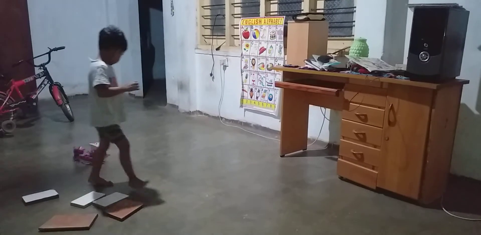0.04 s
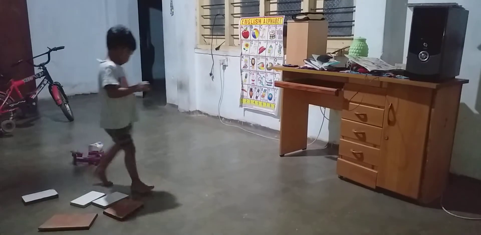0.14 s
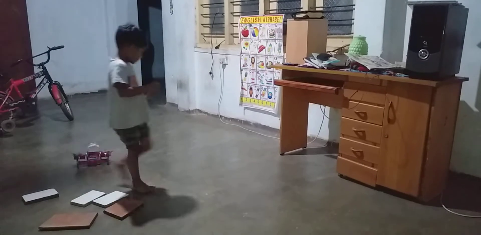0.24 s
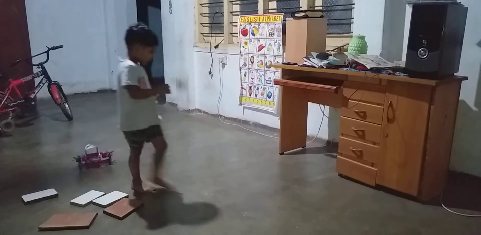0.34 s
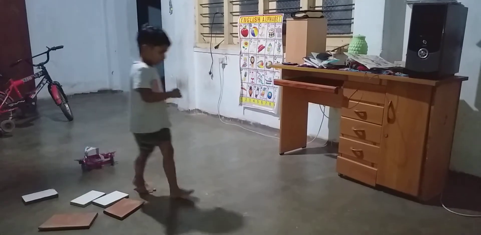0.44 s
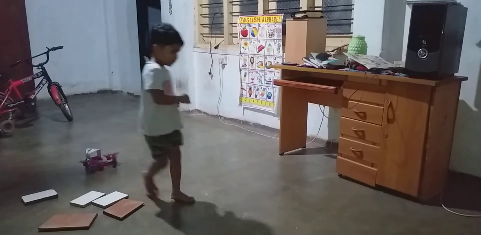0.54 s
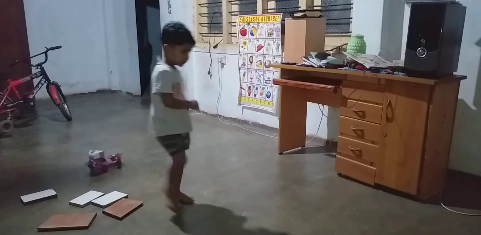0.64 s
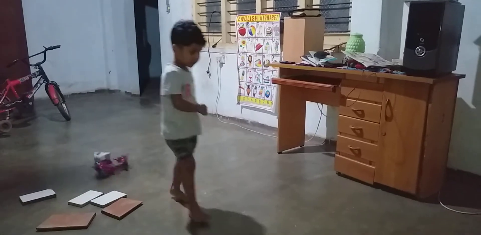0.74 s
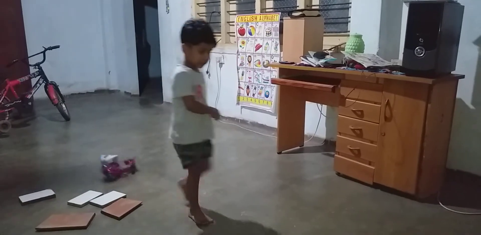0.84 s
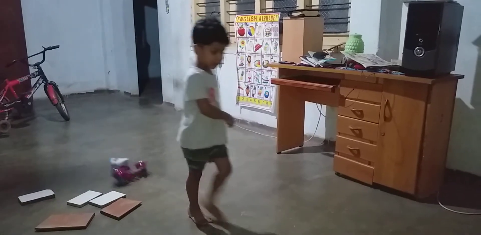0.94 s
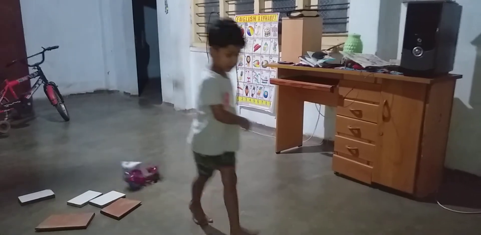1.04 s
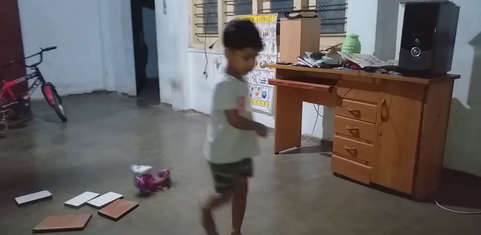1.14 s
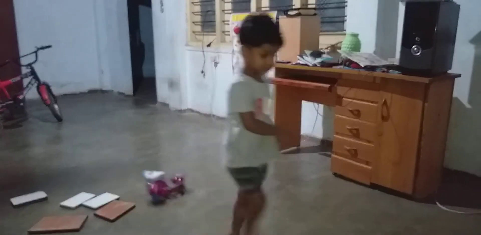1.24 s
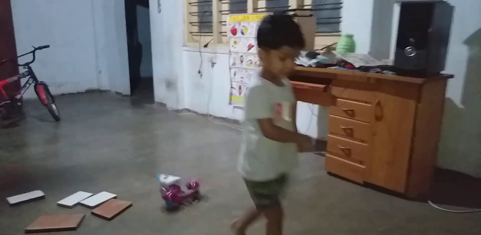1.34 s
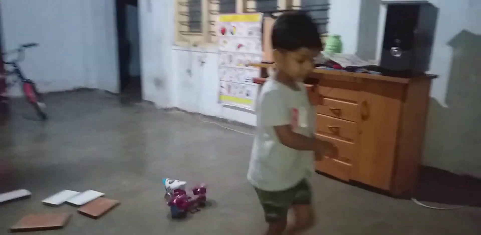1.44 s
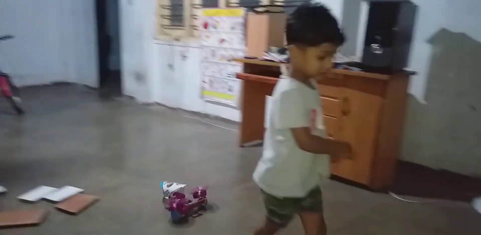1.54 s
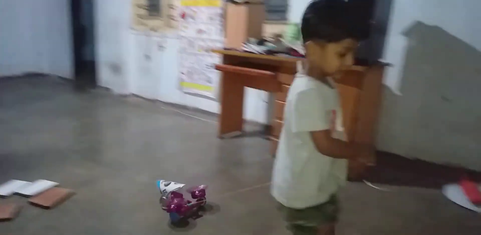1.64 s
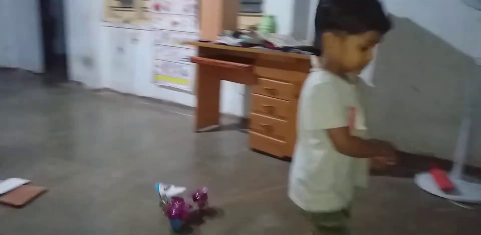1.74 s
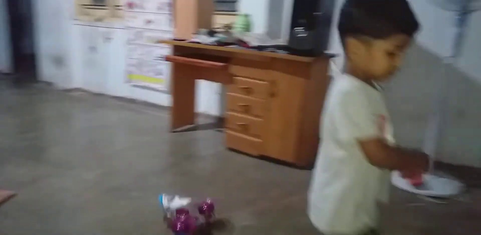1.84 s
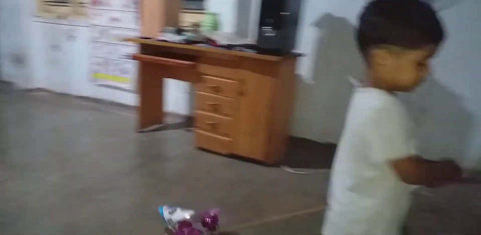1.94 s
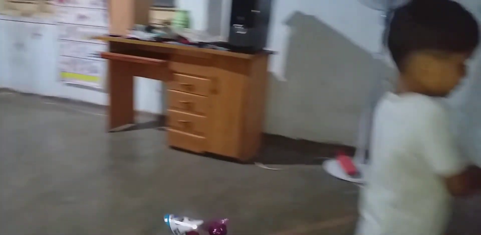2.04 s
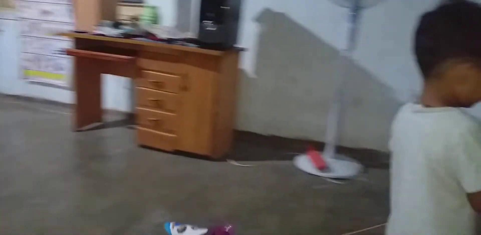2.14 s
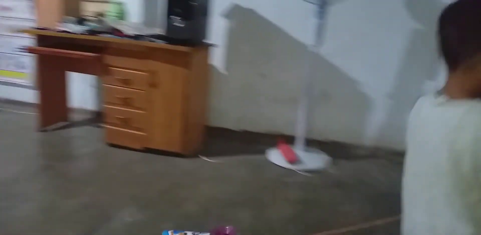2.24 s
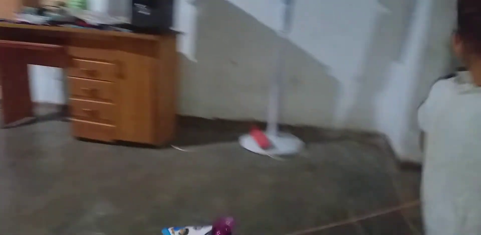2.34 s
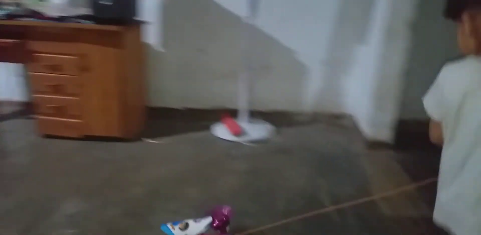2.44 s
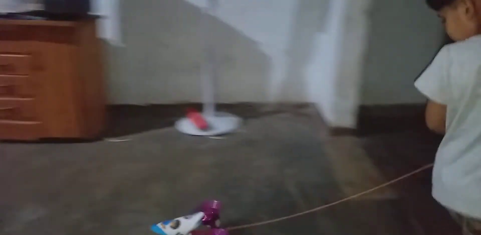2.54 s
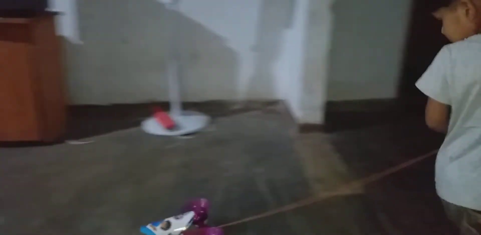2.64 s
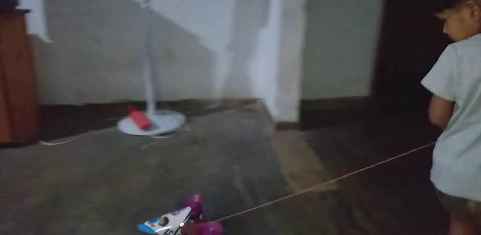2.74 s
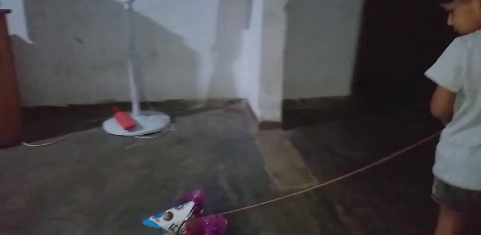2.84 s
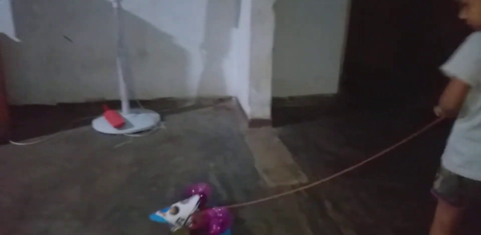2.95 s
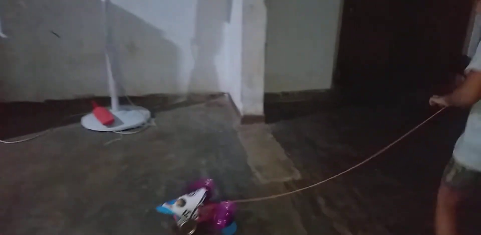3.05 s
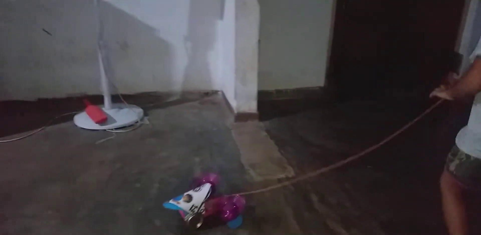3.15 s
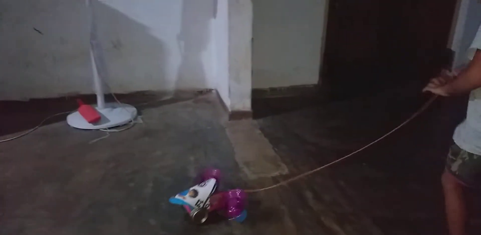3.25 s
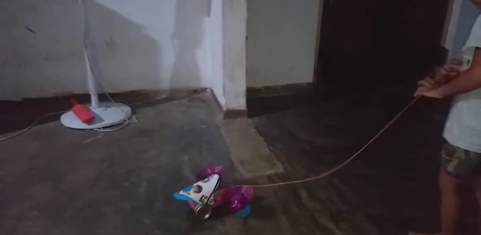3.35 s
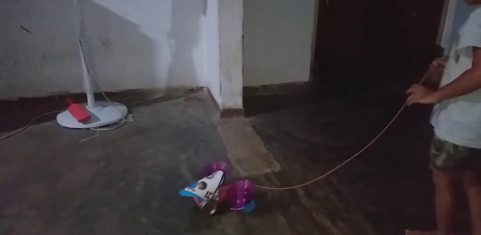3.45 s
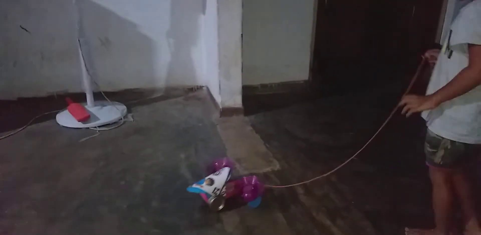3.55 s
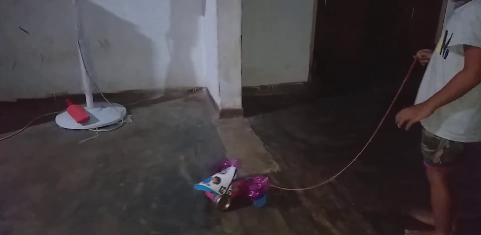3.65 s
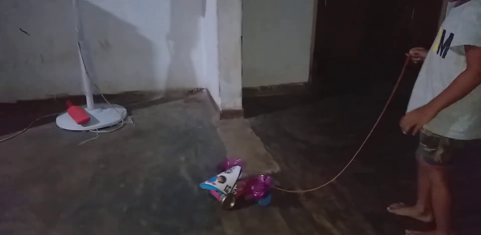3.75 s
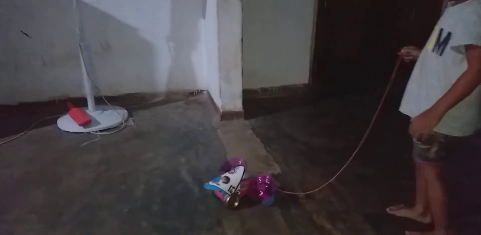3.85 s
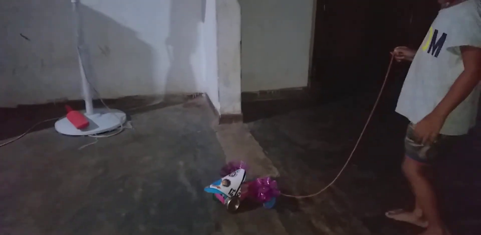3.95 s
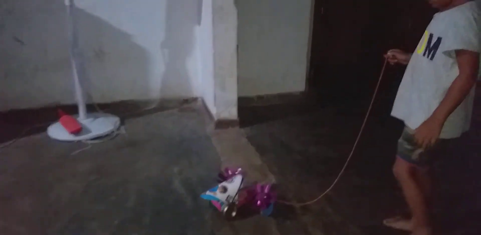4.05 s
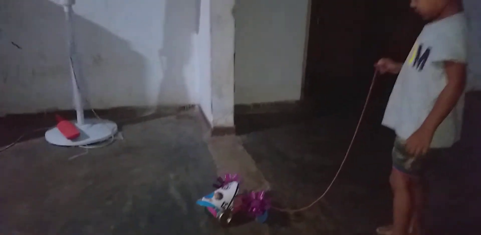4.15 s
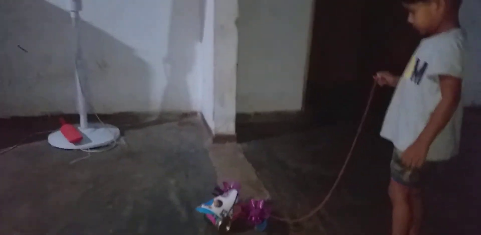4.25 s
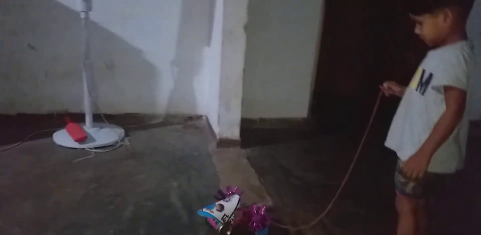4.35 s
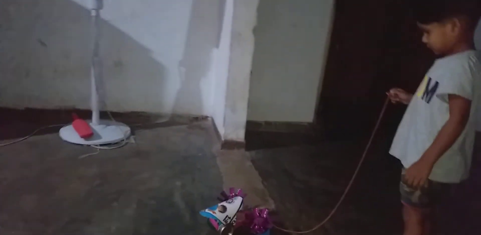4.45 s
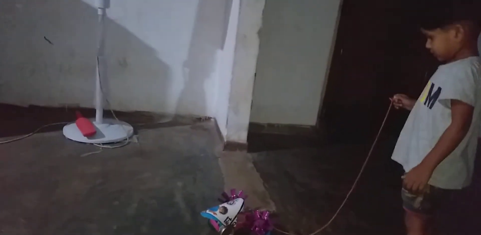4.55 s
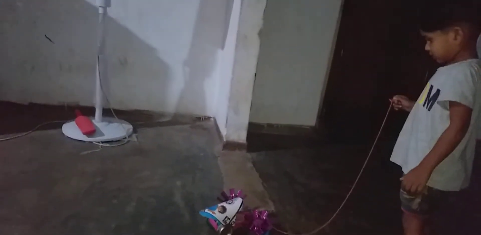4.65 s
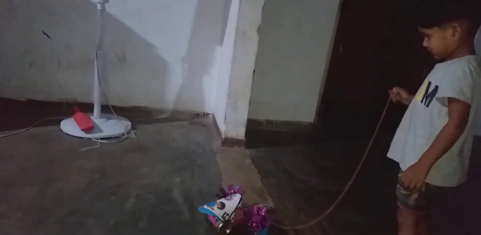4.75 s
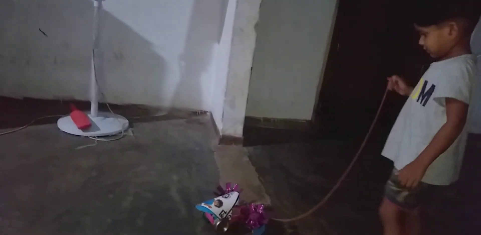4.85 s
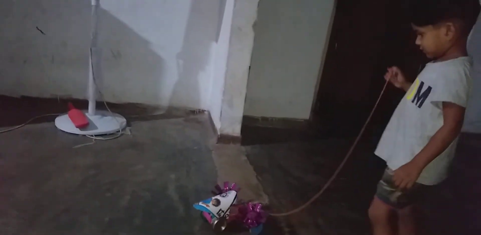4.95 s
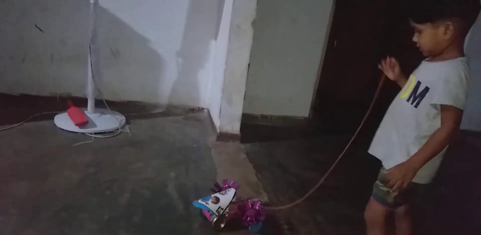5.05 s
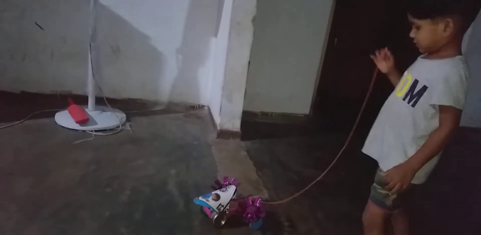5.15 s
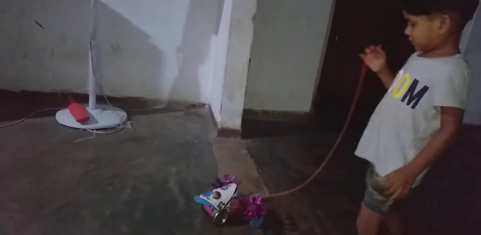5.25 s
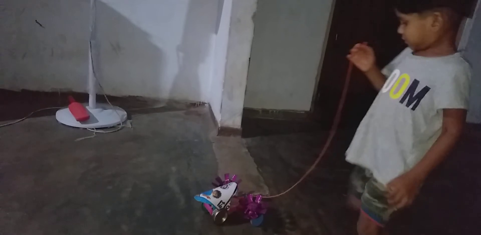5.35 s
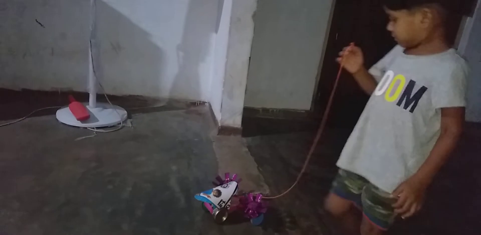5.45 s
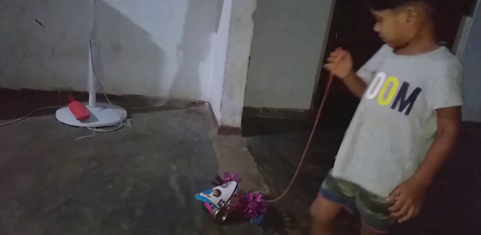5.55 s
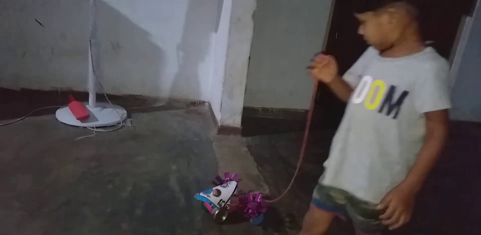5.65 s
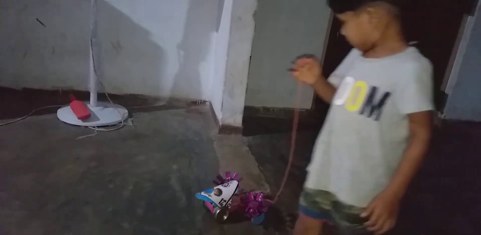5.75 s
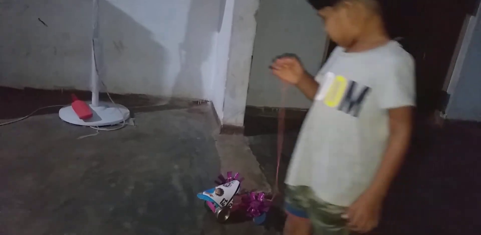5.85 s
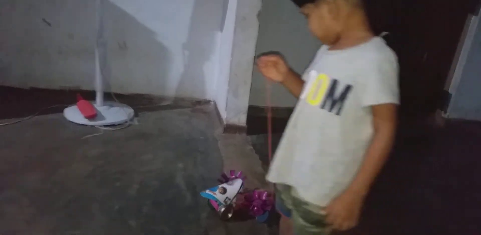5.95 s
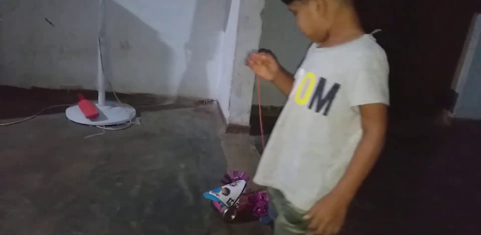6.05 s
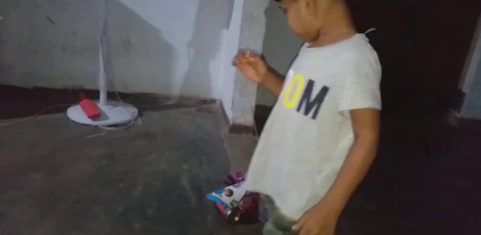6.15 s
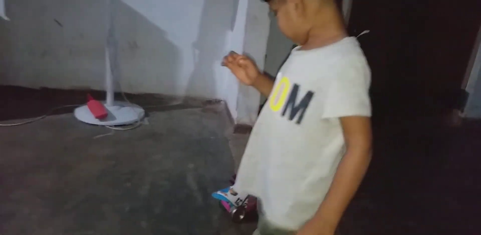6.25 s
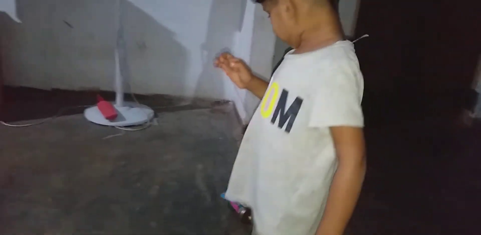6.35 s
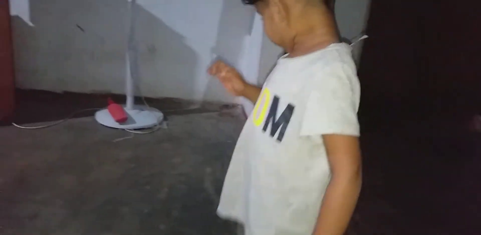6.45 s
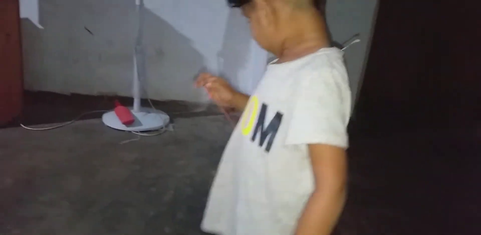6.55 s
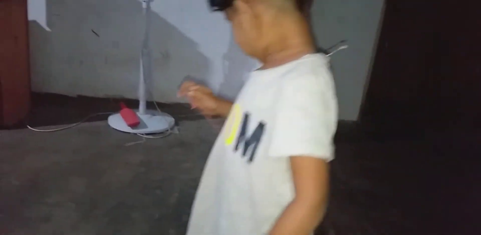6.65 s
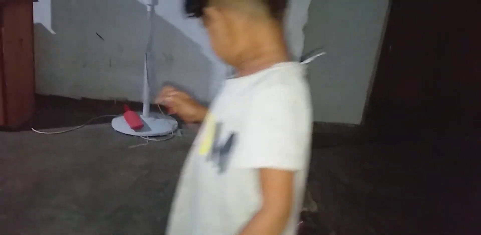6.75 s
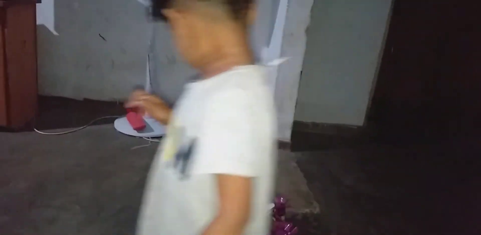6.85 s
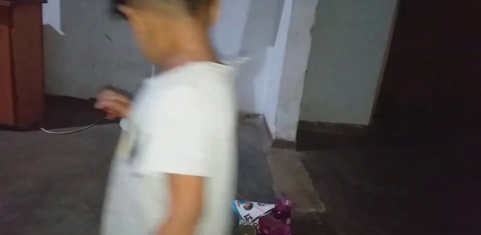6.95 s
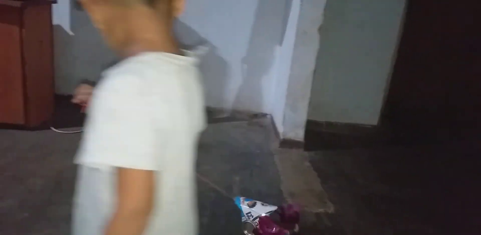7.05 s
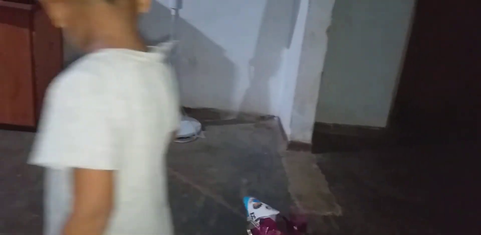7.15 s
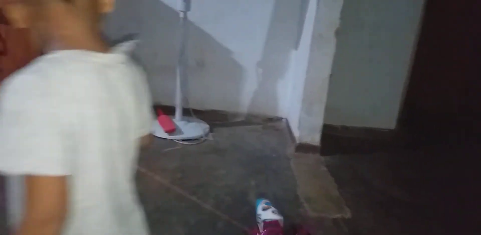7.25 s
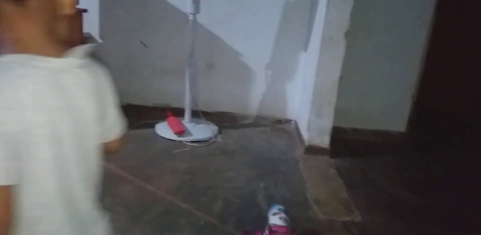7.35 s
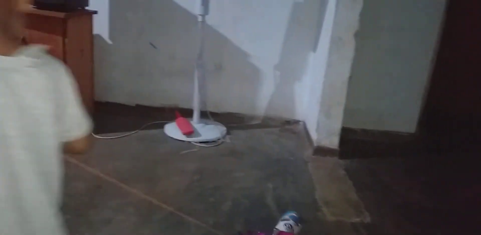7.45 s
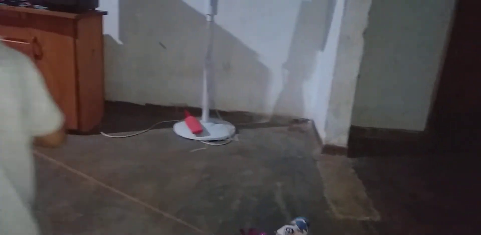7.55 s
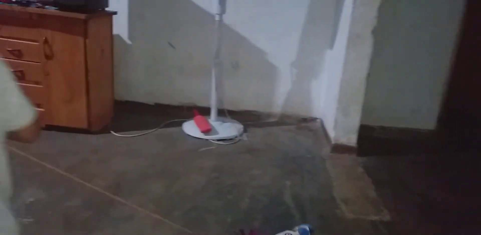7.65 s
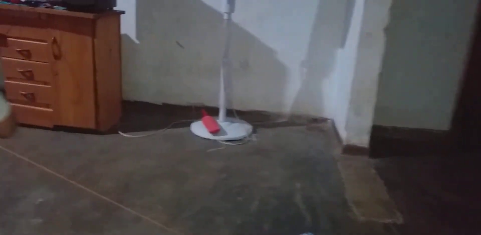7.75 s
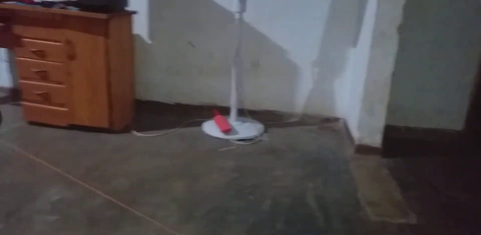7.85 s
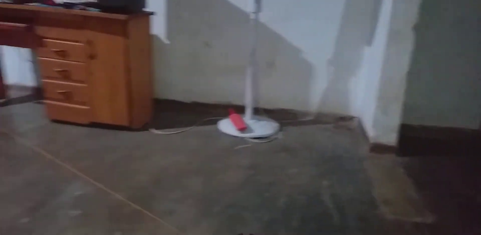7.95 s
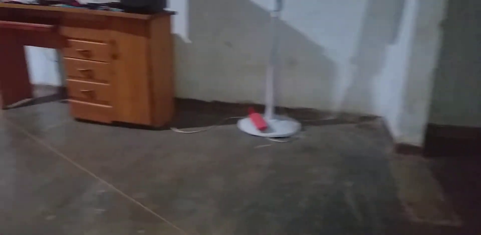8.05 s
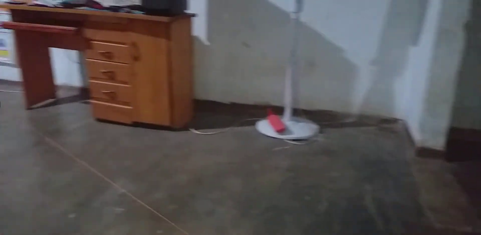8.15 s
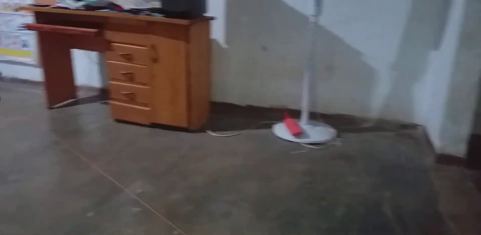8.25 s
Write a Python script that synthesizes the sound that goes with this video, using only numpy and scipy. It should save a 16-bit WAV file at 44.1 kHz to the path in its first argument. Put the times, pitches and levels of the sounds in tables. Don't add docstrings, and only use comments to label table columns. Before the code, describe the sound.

Small toy wheels grind over gritty cement while sharp tinny snaps speed up, slow and stop, then return after a quiet pause, in an echoing room.

```python
import sys
import numpy as np
from scipy import signal
from scipy.fft import rfft, irfft, next_fast_len
from scipy.io import wavfile
from scipy.ndimage import uniform_filter1d

SR = 44100
rng = np.random.default_rng(int(sys.argv[2]) if len(sys.argv) > 2 else 0)


def digitize_waveform(pressure):
    field = np.atleast_2d(pressure).T
    bounded = np.clip(field, -1, 1)
    quanta = np.round(bounded * 32767).astype(np.int16)
    wavfile.write(sys.argv[1], SR, quanta)


def voltage_ratio(level):
    return 10 ** (np.asarray(level, float) / 20)


N = 366030
T = np.arange(N) / SR

# frequency in Hz, density in dB per Hz.
CRACK = [(150, -87.5), (250, -42), (1380, -32), (1530, 2), (1700, -9.5), (2670, -8), (3770, -9.5),
         (7310, -18.5), (9170, -30), (11700, -23.5), (16000, -20)]
# frequency in Hz, density in dB per Hz.
GRIT = [(150, -54.5), (250, -25), (452, -24), (875, -7.5), (1020, -13), (2050, 2), (2530, -9.5),
        (5350, -9.5), (9010, -30.5), (10400, -17), (16000, -14)]


def level(x, db):
    return x * voltage_ratio(db) / np.sqrt(np.mean(x ** 2))


def on_log_hz(table, hz):
    points = np.array(table)
    return np.interp(np.log(hz + 1), np.log(points[:, 0]), points[:, 1])


def convolve(x, response):
    size = next_fast_len(len(x) + len(response))
    return irfft(rfft(x, size) * rfft(response, size), size)[:len(x)]


def colour(x, table):
    log_gain = on_log_hz(table, np.linspace(0, SR / 2, 1025)) * np.log(10) / 20
    ceps = irfft(log_gain)
    ceps[1:1024] *= 2
    return convolve(x, irfft(np.exp(rfft(ceps[:1025], 2048))))


def high(x, hz):
    return signal.sosfilt(signal.butter(3, hz, "high", fs=SR, output="sos"), x)


def rings(x, peaks):
    return sum(voltage_ratio(db) * signal.lfilter(*signal.iirpeak(hz, hz / width, SR), x) for hz, width, db in peaks)


def narrow_noise(hz, width, skirt):
    inner = rings(rng.standard_normal(N), [(hz, width, 0)])
    return level(rings(inner, [(hz, skirt * width, 0)]), 0)


def curve(table):
    points = np.array(table)
    return np.interp(T, points[:, 0], points[:, 1], -120, -120)


def swell(start, length, power):
    return np.sin(np.pi * np.clip((T - start) / length, 0, 1)) ** power


def walk(rate):
    k = int(SR / rate)
    held = np.repeat(rng.standard_normal(N // k + 1), k)
    return 0.67 * uniform_filter1d(uniform_filter1d(held, k), k)[:N]


def waver(hz, spread_hz, rate):
    return np.sqrt(2) * np.sin(2 * np.pi * np.cumsum(hz + spread_hz * walk(rate)) / SR)


def grains(per_s, spread_db):
    ticks = (rng.random(N) < per_s / SR) * rng.standard_normal(N)
    size_db = spread_db * np.minimum(rng.exponential(size=N), 4)
    return level(ticks * voltage_ratio(size_db), 0)


def crickets():
    # start in seconds, length in seconds, level in dB.
    chirp_rows = [(3.75, .3, -50), (4.093, 0.23, -75), (4.364, 0.13, -69.5), (4.652, 0.25, -68.5),
                  (4.879, 0.17, -67), (5.04, 0.19, -67), (5.22, 0.17, -71), (5.462, 0.22, -65.5),
                  (5.80, 0.2, -64), (6.069, 0.33, -68), (6.45, .25, -52), (6.8, .25, -70),
                  (7.15, 0.37, -73)]
    # frequency in Hz, width in Hz, level in dB.
    chorus = [(5040, 300, -73.5), (5600, 150, -82), (6900, 300, -75.5), (7940, 500, -73.5),
              (8040, 160, -75)]
    song_hz = 3350
    chirps = sum(voltage_ratio(db) * swell(s, length, 0.59) for s, length, db in chirp_rows)
    throb = 1 + .25 * waver(24, 6.0, 4)
    wing = throb * waver(song_hz, 60, 300)
    blur = narrow_noise(song_hz, 150, 2)
    near = (chirps + voltage_ratio(-74)) * (.7 * wing + .7 * blur)
    far = sum(voltage_ratio(db + 3.0 * walk(4.4)) * narrow_noise(hz, width, 3.0) for hz, width, db in chorus)
    return near + far


def night():
    # frequency in Hz, level in dB.
    hum_tones = [(64, -69), (100, -73), (160, -74.5), (199.5, -61), (245, -75.5), (344, -74), (500, -68)]
    # frequency in Hz,
    # density in dB per Hz.
    air_shape = [(20, -23.5), (60, -9), (200, -7), (330, -13), (560, -16), (950, -22.5), (2000, -22),
                 (2750, -30.5), (3600, -23), (4300, -32.5), (7950, -24.5), (9700, -23), (10300, -40.5),
                 (16000, -39)]
    # start in seconds, length in seconds, extra level in dB.
    draughts = [
        (.6, .6, 4.5),
        (4.696, 1.33, 3.5),
        (5.7, 2.56, 5),
    ]
    hum = sum(voltage_ratio(db + 2.0 * walk(3.4)) * waver(hz, 2.3, 7.6) for hz, db in hum_tones)
    air = level(colour(rng.standard_normal(N), air_shape), -58.5)
    draught_db = sum(db * swell(s, length, 0.84) for s, length, db in draughts) - 3.0
    return crickets() + (hum + air) * voltage_ratio(draught_db + .8 * walk(2.9))


def creeps():
    # start in seconds, length in seconds, frequency in Hz, width in Hz, level in dB.
    whispers = [
        (5.16, 0.24, 1830, 302, -61),
        (5.361, 0.56, 5600, 300, -69),
        (5.7, .2, 1580, 120, -69),
    ]
    return sum(swell(s, length, 1) * voltage_ratio(db) * narrow_noise(hz, width, 2) for s, length, hz, width, db in whispers)


def shuffle():
    # start in seconds, length in seconds, level in dB, dull part in dB.
    rubs = [
        (4.8, .12, -62, -18),
        (5.02, 0.29, -62.5, -2),
        (5.36, 0.12, -66, -9),
        (5.523, 0.063, -63, -8),
        (5.55, 0.19, -70, -6),
        (5.758, 0.2, -64, -10),
        (6.3, .1, -67, -1),
        (6.373, 0.056, -55, -7),
    ]
    rub = grains(9000, 2.5)
    bands = [(1800, 730, 0), (5000, 4000, 0), (12000, 6700, 0)]  # Hz, width in Hz, dB
    dull, middle, bright = (level(rings(rub, [band]), 0) for band in bands)
    rustle = middle + voltage_ratio(-10) * high(bright, 6500)
    return sum(swell(s, length, 0.86) * voltage_ratio(db) * (rustle + voltage_ratio(dull_db) * dull) for s, length, db, dull_db in rubs)


def steps():
    # time in seconds, peak level in dB, frequency in Hz.
    heels = [(0.469, -38.5, 426), (0.727, -39.5, 354), (0.799, -51, 431), (0.868, -58, 374),
             (0.85, -43, 200), (1.079, -61, 192), (1.871, -46, 307), (2.049, -39, 395), (2.215, -44, 300),
             (2.448, -42, 410), (2.649, -48, 285), (2.95, -44.5, 300), (3.349, -44.5, 380),
             (5.1, -55.5, 207), (6.397, -59, 199), (6.929, -48, 401), (7.499, -48, 346), (7.999, -44, 410)]
    out, t = np.zeros(N + SR), T[:SR // 4]
    for s, db, hz in heels:
        push = rng.standard_normal(len(t)) * t / .01 * np.exp(-t / 0.055)
        thump = rings(push, [(hz, 0.25 * hz, 0)])
        start = int(s * SR)
        out[start:start + len(t)] += voltage_ratio(db + 3.0) * thump / np.max(abs(thump))
    return out[:N]


def scrape():
    # time in seconds, level in dB.
    pressure = [
        (6.36, -63),
        (6.396, -59),
        (6.438, -50.5),
        (6.514, -33.5),
        (6.534, -32.5),
        (6.646, -43),
        (6.72, -51),
    ]
    # frequency in Hz, width in Hz, level in dB.
    shell_rings = [(2170, 20, -11.5), (3870, 40, -4.5), (5050, 95, -4.5), (6250, 29, -14), (6930, 68, -9),
                   (10940, 64, -19.5), (12400, 54, -33), (13200, 83, -18), (14100, 63, -26)]
    slips, press_db = grains(6000, 2.2), curve(pressure)
    shell = high(rings(slips, [(hz, 3.0 * width, db) for hz, width, db in shell_rings]), 700)
    rasp = level(colour(slips, GRIT), -5)
    return voltage_ratio(press_db) * (voltage_ratio(0.67 * (press_db + 38)) * level(shell, -2) + rasp)


def wheels():
    # time in seconds, level
    # in dB.
    rolling = [(0, -32), (.34, -28.5), (1.02, -26), (2.02, -19), (2.72, -24.5), (3.52, -36), (3.96, -46.5),
               (4.25, -58), (4.31, -75), (6.41, -75), (6.51, -43), (6.75, -33), (7.09, -30), (7.3, -29.5),
               (7.47, -29.5), (7.91, -28.5), (8.31, -22)]
    # frequency in Hz, width in Hz, level in dB.
    frame_rings = [(845, 58, -11), (2070, 270, 0.5), (3037, 190, -1.5), (5500, 410, -1.5),
                   (6820, 1000, -7.5), (12600, 100, -7), (14200, 800, -3), (15100, 200, -14.5)]
    roll_db, patchy = curve(rolling), voltage_ratio(1.6 * walk(13))
    frame = level(high(rings(grains(3000, 3.0), frame_rings), 460), -7.0)

    axle_hz = 5399.5 + 28 * np.clip(roll_db + 29.5, -12, 0)
    tone = np.sqrt(2) * np.sin(2 * np.pi * np.cumsum(axle_hz) / SR)
    rub = level(uniform_filter1d(grains(2800, 3.7), 170), -13.5)
    axle = rub * voltage_ratio(-.8 * np.clip(roll_db + 34, 0, 9)) * tone

    crushed = level(colour(grains(9000, 2.0), GRIT), -1.7)
    sound = level(patchy * (frame + axle + crushed), 0)
    treble = signal.sosfiltfilt(signal.butter(3, 9500, "high", fs=SR, output="sos"), sound)
    treble_db = np.where(T < N / SR * .6, -0.5, -6.5) + 6.2 * swell(7.08, .7, 1)
    return voltage_ratio(roll_db) * (sound - treble + voltage_ratio(treble_db) * treble)


def echo(build_s, early_db, early_t60):
    # frequency in Hz, reverberation time in seconds.
    room_t60 = [(300, 0.64), (1500, 0.85), (4000, 0.96), (12000, 0.59)]
    t = T[:SR + SR // 5]
    walls = rng.standard_normal(len(t)) * (rng.random(len(t)) < .15) * voltage_ratio(early_db - 60 * t / early_t60)
    tail, edges = 0, 300 * 2. ** np.arange(7)
    for lo, hi in zip(edges[:-1], edges[1:]):
        octave = signal.butter(2, [lo, hi], "band", fs=SR, output="sos")
        band = signal.sosfilt(octave, rng.standard_normal(len(t)))
        tail = tail + band * voltage_ratio(-60 * t / on_log_hz(room_t60, np.sqrt(lo * hi)))
    answer = (walls + tail * (1 - np.exp(-t / build_s))) * (t > .002)
    return answer / np.sqrt(np.sum(answer ** 2))


def snaps():
    # time in seconds, strength in dB.
    speeding = [(0.3339, -2.5), (0.4743, -6), (0.605, -5.5), (0.7085, -4), (0.7709, -4), (0.8334, -4.5),
                (0.9009, -7), (0.9671, -5), (1.0111, -3.5), (1.0617, -6.5), (1.1053, -5.5), (1.1664, -4.5),
                (1.2045, -6), (1.2537, -3), (1.2965, -7)]
    # time in seconds, strength in dB.
    run_marks = [
        (1.35, -6.5),
        (1.5269, -6),
        (1.6683, -4.5),
        (1.7409, -8),
        (1.8725, -6.5),
        (2.1167, -4.5),
        (2.2473, -6.5),
    ]
    run_turns = (0, 5, 8, 10, 13, 19, 22)
    # time in seconds, strength in dB.
    slowing = [(2.3045, -5), (2.3753, -6.5), (2.458, -6), (2.5247, -7), (2.5755, -7), (2.66, -9.5),
               (2.759, -9.5), (2.8334, -8.5), (2.9323, -9), (3.0522, -11), (3.203, -7.5), (3.3235, -7.5),
               (3.4723, -7.5), (3.6817, -8)]
    # time in seconds, strength in dB.
    pulled_back = [
        (7.4643, -1),
        (7.5914, -2),
        (7.7073, -2),
        (7.8294, -4),
        (7.9486, -2),
        (8.037, -3),
        (8.1293, -3),
        (8.229, -4.5),
    ]
    turns = np.arange(run_turns[-1] + 1)
    run = np.transpose([np.interp(turns, run_turns, column) for column in np.transpose(run_marks)])
    return np.vstack([speeding, run, slowing, pulled_back])


def snap(chance):
    # frequency in Hz, level in dB, 60 dB decay time in seconds.
    modes = [(760, -14, 0.013), (1547, -9.5, 0.18), (1650, -9, 0.092), (1844.6, 1, 0.087),
             (1943, -6, 0.087), (2230, -5, .07), (2546, -12, .06), (2884, -27.5, 0.11), (3043, -11, 0.049),
             (3792, -9.5, 0.049), (5110, -15.5, 0.037), (6638, -11.5, 0.045), (12050, -12, 0.018),
             (15870, -22, .015)]
    t = T[:SR // 10, None]
    hz, db, t60 = np.transpose(modes)
    strike_db, detune, phase = chance[:3, :len(hz)]
    decay = np.exp(-np.log(1000) * t / t60)
    ring = voltage_ratio(db - 12.5 + strike_db) * decay * np.sin(2 * np.pi * hz * (1 + .005 * detune) * t + .3 * phase)
    bounces = 0.11 * rng.standard_normal(len(t)) * np.exp(-t[:, 0] / 0.0022)
    is_deep = hz < 2700
    deep = high(ring[:, is_deep].sum(1), 1100)
    bright = high(ring[:, ~is_deep].sum(1), 1200)
    return deep, bright, high(colour(bounces, CRACK), 3283)


def clacker(rooms):
    # time in seconds, open side of the shell towards the phone from 0 to 1, direct over room sound in dB.
    path = [
        (.3, 0, -3.5),
        (1.1, 0.39, 1.5),
        (1.7, 0.87, -0.5),
        (2.3, 0.92, 1.5),
        (2.9, 1, -5),
        (3.7, 0.99, -2),
        (7.4, 0.95, 0),
        (8.3, 0.89, 1.5),
    ]
    sides_db = [(7, -4.5), (-20.5, 7.5), (14.5, 26), (-1, 0)]
    slow_gap_s, quick_dull_db = .13, 1.5
    direct, sent = np.zeros(N + SR), np.zeros((len(rooms), N + SR))
    when, facing, near = np.transpose(path)
    t = T[:SR // 10]
    blow = colour(1. * (t == 0), CRACK)
    first_swing = (1 + 1.3 * np.exp(-t / 0.014)) * (1 - np.exp(-t / 0.0013))
    rows = snaps()
    for (s, db), gap in zip(rows, np.diff(rows[:, 0], prepend=0)):
        chance = rng.standard_normal((4, 32))
        deep, bright, crack = snap(chance)
        share, near_db = np.interp(s, when, facing), np.interp(s, when, near)
        deep_db, bright_db, crack_db, room_db = (away + share * (open_db - away) for away, open_db in sides_db)
        crack_db += quick_dull_db * np.log2(min(gap / slow_gap_s, 1))
        at = slice(int(s * SR), int(s * SR) + len(deep))
        heard = voltage_ratio(deep_db) * first_swing * deep + voltage_ratio(bright_db) * (bright + voltage_ratio(crack_db) * crack)
        direct[at] += voltage_ratio(db + near_db / 2) * heard
        place = chance[3, :len(rooms), None]
        place = place / np.sqrt(np.sum(place ** 2))
        spread = deep + voltage_ratio(room_db) * (bright + voltage_ratio(29.0) * blow)
        sent[:, at] += voltage_ratio(db - near_db / 2 + 7.5) * place * spread
    return direct[:N] + sum(convolve(x[:N], room) for x, room in zip(sent, rooms))


def scene():
    # frequency in Hz, gain in dB.
    mic = [(20, 3), (60, -1), (7000, 1), (8200, 3.5), (9100, -4), (9900, 6), (12000, 1), (15500, -2)]
    rooms = [echo(build_s=0.0031, early_db=13, early_t60=0.37) for _ in range(3)]
    rubbing = wheels() + scrape() + steps() + shuffle()
    toy = clacker(rooms) + voltage_ratio(-0.5) * rubbing + voltage_ratio(-4) * convolve(rubbing, rooms[0])
    return (colour(toy, mic) + night() + creeps())[None]


def band_limit(x):
    return signal.sosfilt(signal.butter(12, 16660, fs=SR, output="sos"), x)


def record(dry):
    held = dry / (1 + (dry / 1.02) ** 4) ** .25
    x = signal.sosfilt(signal.butter(6, 55, "high", fs=SR, output="sos"), held)
    x = signal.sosfilt(signal.ellip(8, .3, 38, 15670, fs=SR, output="sos"), x)
    return band_limit(x)


dry = scene()
out = record(dry)
digitize_waveform(out)
```